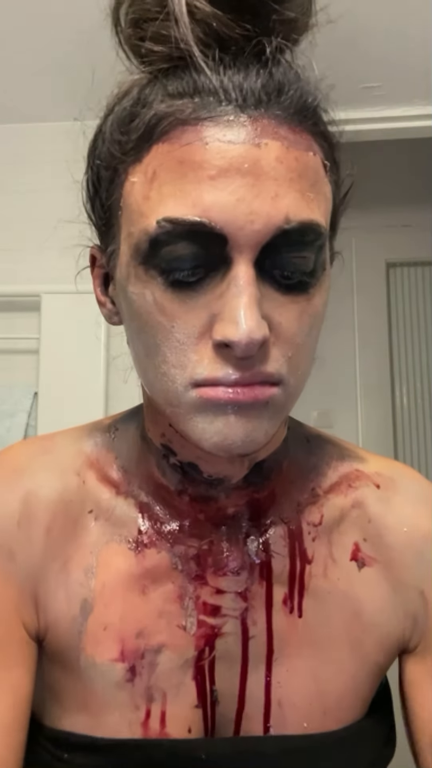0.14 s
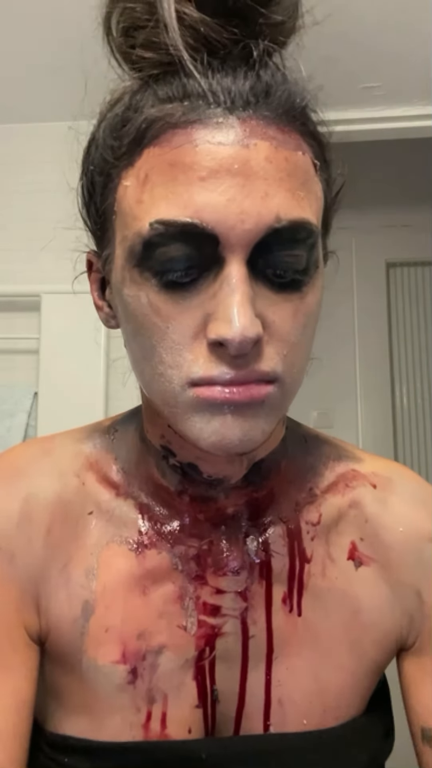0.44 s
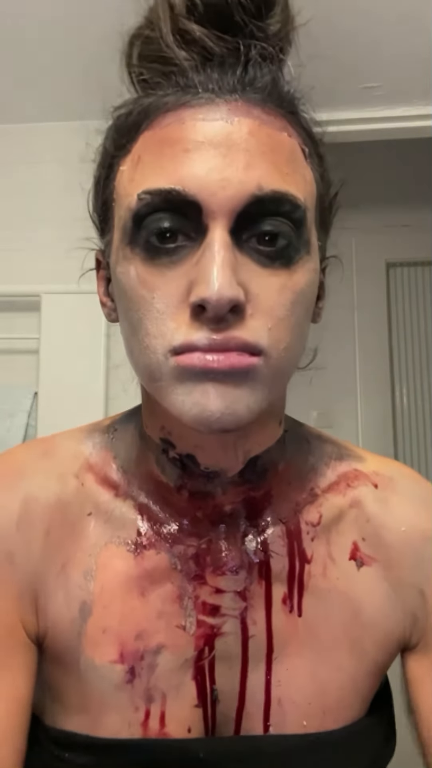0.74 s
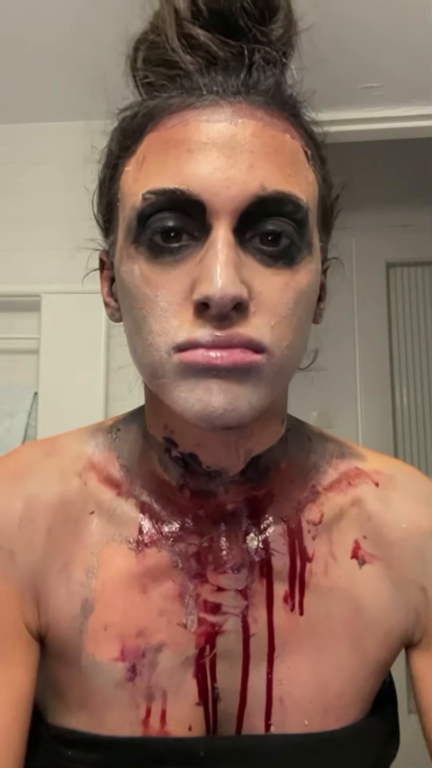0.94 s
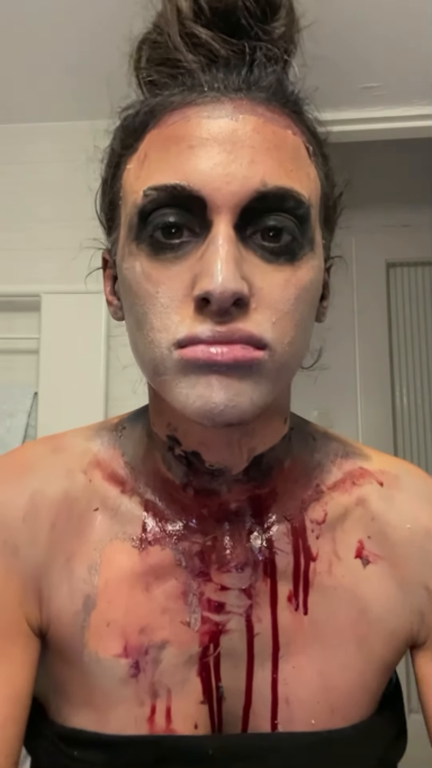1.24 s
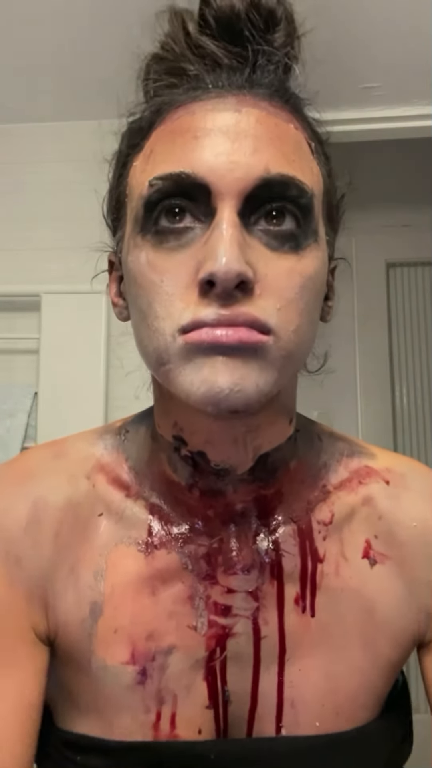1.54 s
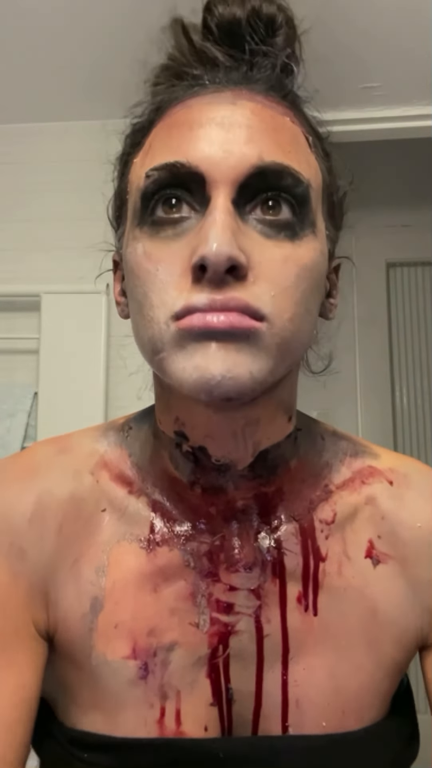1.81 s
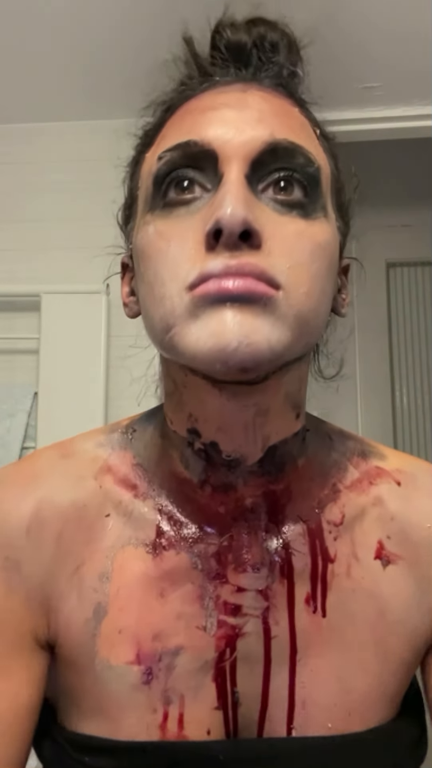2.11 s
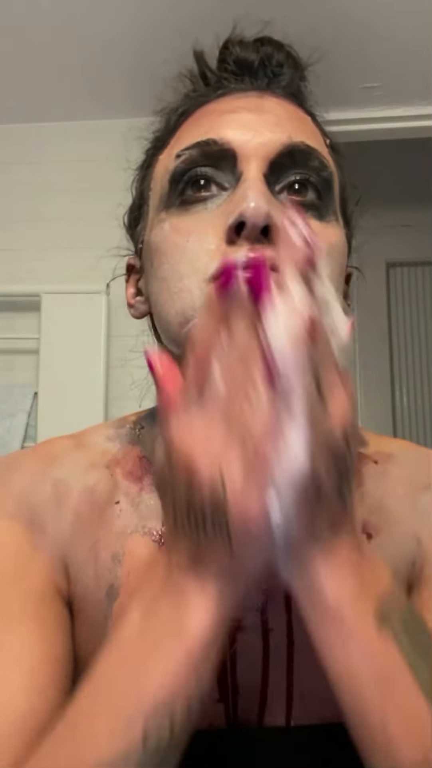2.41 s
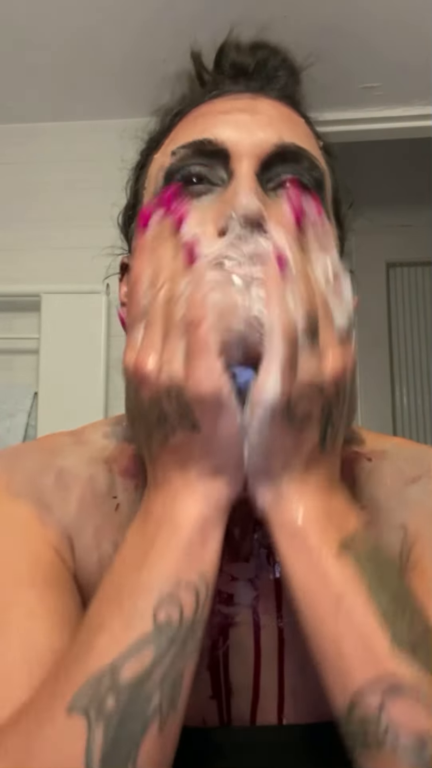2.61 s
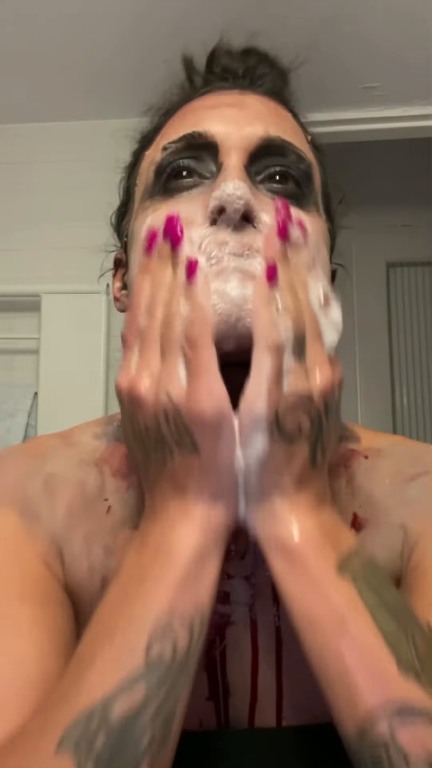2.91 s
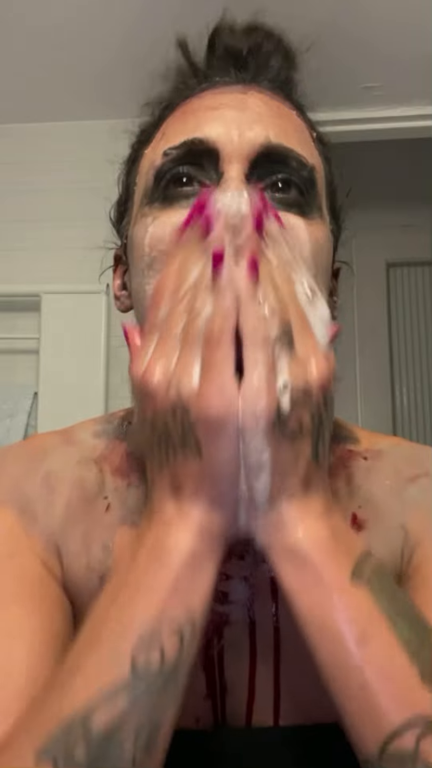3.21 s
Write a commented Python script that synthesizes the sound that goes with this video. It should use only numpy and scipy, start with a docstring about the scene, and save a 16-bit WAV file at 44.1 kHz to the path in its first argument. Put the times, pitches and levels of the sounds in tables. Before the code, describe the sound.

Soapy hands rub together from 0 to about 1.85 seconds: dense, bright, crackly squelches, strongest near 0.2 to 0.4, with snapping bubbles, rising plops, soft low thumps of air and a faint hollow basin ring. A near lull follows until about 2.35, then quieter sliding, tiny pops and dull cheek bumps near 2.7, and sparse wet clicks from 2.8 to the end. Small hard bathroom, close, steady hiss.

```python
"""Soapy hands over a basin

Wet hands rub together over a bathroom basin, then spread the lather more gently over a face.
Each squelch is a run of tiny ruptures: the soap film crackles, an air pocket rings, the flesh slaps.
Single bubbles snap, air pockets plop in rising notes, pushed air thumps low, wet skin slides.
Hands bump the cheeks, and the basin's hollow note sounds at listed moments.
The small hard room rings with resonances and decaying noise echoes, over a steady coloured hiss."""
import sys
import numpy as np
from scipy import signal
from scipy.fft import rfft, irfft
from scipy.io import wavfile

SR = 44100
rng = np.random.default_rng(int(sys.argv[2]) if len(sys.argv) > 2 else 0)


def transcribe(u):
    """Save the signal u as a 16-bit wav file named by the first command-line argument.

    u: samples, shape (n,) or (channels, n), limited to [-1, 1]; the rate is SR.
    q: integer samples, one column per channel.
    """
    v = np.clip(np.atleast_2d(u).T, -1, 1)
    q = np.round(v * 32767).astype(np.int16)
    wavfile.write(sys.argv[1], SR, q)


N = 147735
T = np.arange(N) / SR   # time in seconds

# Hand squeezes, except the first row, a short hissy burst; levels before the trims below:
# start_s, length_s, flesh_db, pocket_db, film_db, pocket_hz
SQUELCHES = [(0, 0.023, -55, -50.5, -36, 3130), (0.045, 0.039, -54.5, -44, -56, 2650),
             (0.121, 0.029, -40, -37, -34.5, 2340), (0.176, 0.016, -43.5, -38.5, -34.5, 2110),
             (0.202, 0.015, -38, -32, -33, 2850), (0.223, 0.0082, -33.5, -27, -20.5, 2700),
             (0.228, 0.022, -43, -52, -36.5, 2730.0), (0.284, 0.029, -40.5, -40.5, -55, 2030),
             (0.308, 0.012, -31, -31, -31.5, 2300), (0.333, 0.012, -47, -45, -36, 2000.0),
             (0.37, 0.022, -44, -32.5, -37, 2220), (0.384, 0.012, -31.5, -24, -29, 2790),
             (0.405, 0.024, -45, -61, -46, 2740.0), (0.492, 0.019, -41.5, -40, -41.5, 2520),
             (0.562, 0.025, -41.5, -36, -39.5, 1580), (0.667, 0.022, -45.5, -48, -48, 2300),
             (0.695, 0.0083, -67, -31.5, -36, 3100), (0.709, 0.022, -54, -46, -37, 3000),
             (0.748, 0.0082, -45, -37, -38, 2340), (0.764, 0.0072, -40, -28, -35.5, 1800),
             (0.78, 0.029, -48.5, -49, -50, 1760), (0.851, 0.012, -37.5, -35.5, -37.5, 2060),
             (0.872, 0.019, -37, -29.5, -31.5, 2360), (0.887, 0.0082, -39, -56, -36, 2140),
             (0.934, 0.012, -44, -33, -28.5, 2090), (0.953, 0.015, -32.5, -29.5, -33.5, 2130),
             (0.973, 0.018, -47.5, -40, -36, 3040), (1.063, 0.02, -35, -30.0, -31, 2350),
             (1.117, 0.018, -46, -39, -33.5, 2300), (1.14, 0.01, -29, -27.5, -30.5, 2090),
             (1.157, 0.018, -49, -33.5, -36, 2900), (1.249, 0.016, -37.5, -27, -31, 2005),
             (1.312, 0.0066, -35, -29, -29.5, 2270), (1.325, 0.015, -38.5, -31.5, -37, 1490),
             (1.356, 0.015, -48, -34, -32.5, 2980), (1.431, 0.011, -36.5, -28, -41, 2300),
             (1.496, 0.0091, -37.5, -31, -30.0, 2210), (1.509, 0.014, -38.5, -36.5, -37, 1460),
             (1.543, 0.0076, -52, -32.5, -35.5, 3460), (1.621, 0.017, -38.5, -32, -38, 2190),
             (1.686, 0.0097, -47, -30.5, -30, 3000), (1.705, 0.011, -32, -30.5, -27.5, 2200),
             (1.72, 0.013, -42, -43, -32, 1610), (1.788, 0.005, -38, -40, -42, 2200.0),
             (1.801, 0.0097, -33, -29.5, -30, 2580), (1.812, 0.02, -44.5, -34.5, -40.5, 1810),
             (2.279, 0.013, -52, -53, -46.5, 1390), (2.824, 0.016, -48.5, -42.5, -41.5, 3120),
             (2.868, 0.0093, -59, -37, -34.5, 3380), (2.911, 0.018, -76, -39, -55, 2390),
             (2.939, 0.0062, -66, -40, -53, 2760), (2.956, 0.014, -54, -41, -48, 3500),
             (3.037, 0.016, -48.5, -42, -40, 3180.0), (3.061, 0.0069, -65, -39, -37, 2510),
             (3.08, 0.0085, -56, -45, -40.5, 2400), (3.179, 0.025, -65, -46.0, -45, 2030),
             (3.253, 0.0049, -53.5, -44, -28.5, 2950), (3.27, 0.021, -59, -41.5, -50, 1600)]
# Tone of slapping flesh: frequency_hz, relative_level_db
FLESH_TONE = [(100, -17), (200, -8.5), (400, -5), (800, -3), (1100, 1), (1600, -15.5), (3000, -33.5)]
# Tone of the tearing soap film, also used by the snaps: frequency_hz, relative_level_db
FILM_TONE = [(1500, -21), (2800, -6.5), (3800, -3.5), (5400, 3.5), (7200, 0), (8600, -9.5), (10000, -17),
             (12000, -19.5), (14000, -8.5), (16000, -20)]
# Tone around the air pocket's resonance: frequency_hz, relative_level_db
POCKET_TONE = [(400, -7), (900, -9), (1300, 0), (2000, -1.5), (3200, 0.5), (4200, 0), (7000, 3),
               (12000, -74)]
FLESH_TRIM_DB, FILM_TRIM_DB = -2.5, -0.5
RUPTURES_PER_S, RUPTURE_SPREAD_DB = 1050, 4.3
PRESS_ATTACK_S, PRESS_RELEASE_S = 0.00074, 0.0017   # time constants
POCKET_WIDTH_HZ, FILM_BUBBLE_HZ = 1050, 5320
POCKET_BUBBLE_GAIN = 0.89   # bubbles against ruptures in the pocket


def squelches(size=4096):
    """Each row sends a run of ruptures into flesh, air pocket and film, and sets bubbles ringing."""
    out, t = np.zeros(N), T[:size]
    for start_s, length_s, flesh_db, pocket_db, film_db, pocket_hz in SQUELCHES:
        attack = 1 - np.exp(-t / PRESS_ATTACK_S)
        release = np.exp(-np.maximum(t - length_s, 0) / PRESS_RELEASE_S)
        press = attack * release

        slap, gurgle, crackle = (press * ruptures(RUPTURES_PER_S, RUPTURE_SPREAD_DB, size) for _ in range(3))
        gurgle = rms_one(resonate(gurgle, pocket_hz, POCKET_WIDTH_HZ))
        gurgle = gurgle + POCKET_BUBBLE_GAIN * bubbles(press, pocket_hz)
        film_bubbles = colour(bubbles(press, FILM_BUBBLE_HZ), FILM_TONE)
        crackle = rms_one(colour(crackle, FILM_TONE)) + rms_one(film_bubbles)

        flesh = from_db(flesh_db + FLESH_TRIM_DB) * rms_one(colour(slap, FLESH_TONE))
        pocket = from_db(pocket_db) * rms_one(colour(gurgle, POCKET_TONE))
        film = from_db(film_db + FILM_TRIM_DB) * rms_one(crackle)
        press_rms = np.sqrt(np.mean(press ** 2))   # a shorter press carries less energy
        add(out, start_s, (flesh + pocket + film) * press_rms)
    return out


SMEAR_GAIN = 0.06   # noise against the clicks


def ruptures(per_s, spread_db, size):
    """Random clicks of either sign and uneven size over a faint smear of noise; rms 1."""
    size_db = spread_db * np.minimum(rng.exponential(1, size), 4)
    sizes = from_db(size_db) * rng.choice([-1, 1], size)
    clicks = rms_one(sizes * (rng.random(size) < per_s / SR))
    return rms_one(clicks + SMEAR_GAIN * rng.standard_normal(size))


BUBBLE_Q, BUBBLE_SPREAD_OCT = 13, 0.858   # pitch strays this far up or down
BUBBLE_MAX_RISE_PER_S = 30.8   # fraction of the starting pitch gained each second


def bubbles(press, hz, count=22):
    """Tiny bubbles around one pitch, each with its own size and glide, born during the press; rms 1."""
    out = np.zeros(2 * len(press))
    for when, octaves, rise, strength in rng.random((count, 4)):
        # births are likelier where the press is stronger
        i = np.searchsorted(np.cumsum(press), when * press.sum())
        bubble_hz = np.clip(hz * 2 ** (BUBBLE_SPREAD_OCT * (2 * octaves - 1)), 300, 9000)
        decay_s = BUBBLE_Q / (np.pi * bubble_hz)
        ring = bubble(bubble_hz, decay_s, rise * BUBBLE_MAX_RISE_PER_S)
        out[i:i + len(ring)] += (2 * strength - 1) * np.sqrt(bubble_hz) * ring
    return rms_one(out[:len(press)])


def bubble(hz, decay_s, rise_per_s, size=1024):
    """Trapped air rings and dies away while its pitch rises."""
    t = T[:size]
    return rising_tone(hz, rise_per_s, t) * np.exp(-t / decay_s)


def rising_tone(hz, rise_per_s, t):
    """A sine whose pitch climbs steadily by a fraction of its start each second."""
    return np.sin(2 * np.pi * hz * t * (1 + rise_per_s * t / 2))


# Single bubbles snapping, level of the ring's peak: start_s, ring_peak_db, start_pitch_hz
SNAPS = [(0.2066, -12, 5200), (0.2274, -12.5, 3770), (0.4168, -15, 5440), (0.7013, -19.5, 5140),
         (0.979, -16.5, 3350), (1.162, -18, 2910), (1.3629, -19.5, 4500), (2.374, -29.5, 4900),
         (2.3945, -37, 3840), (2.4152, -34, 3500), (2.58, -33, 3650), (2.651, -34.5, 3670),
         (2.6843, -26.5, 3360), (2.7326, -28, 3850), (2.8319, -20.5, 4700), (2.9141, -26, 2660),
         (2.956, -25.5, 3450), (2.9633, -30, 3400), (2.969, -27, 6500), (3.0452, -22.5, 3880),
         (3.2554, -18.5, 4930)]
SNAP_CYCLES, SNAP_RISE_PER_S = 16, 15.4   # cycles to fall 60 dB; pitch rise as a fraction per second
CRACK_DB, SPRAY_DB, SPRAY_DECAY_S = -11, -11, 0.0023   # levels against the ring, before the pitch factor


def snaps(size=1024):
    """A bubble cracks, rings for a few cycles at a rising pitch and throws a little spray."""
    out, t = np.zeros(N), T[:size]
    crack = colour(1. * (t == 0), FILM_TONE)   # one click through the film
    crack = from_db(CRACK_DB) * crack / crack.max()
    for start_s, peak_db, hz in SNAPS:
        swell = 1 - np.exp(-2 * t * hz)
        decay = from_db(-60 * t * hz / SNAP_CYCLES)
        ring = rising_tone(hz, SNAP_RISE_PER_S, t) * decay * swell
        spray = rms_one(colour(rng.standard_normal(size), FILM_TONE)) * np.exp(-t / SPRAY_DECAY_S)
        burst = crack + from_db(SPRAY_DB) * spray
        burst = min(hz / 3500, 1) * burst   # big, low bubbles crack and spray less
        add(out, start_s, from_db(peak_db) * (ring / ring.max() + burst))
    return out


# Trapped air plopping out, peak before the room: start_s, peak_db, start_pitch_hz
PLOPS = [(.14, -23.5, 2067), (.2218, -12.5, 2411), (0.2261, -14.5, 3080), (0.3163, -23, 2270),
         (.3885, -19.5, 3390), (.3893, -20, 2030), (0.393, -19.5, 3020), (0.5696, -28.5, 950),
         (.579, -28, 1560), (0.6066, -24.5, 2660), (0.7662, -22, 1920), (.863, -26, 3120),
         (0.8822, -24.5, 2900), (.954, -15, 1820), (.962, -20, 2400), (1.138, -20, 1851), (1.147, -26, 606),
         (1.257, -26, 2230), (1.3613, -25, 4010), (1.4312, -24.5, 1305), (1.434, -22.5, 3330),
         (1.546, -28, 3210), (1.627, -22, 2460), (1.7071, -19.5, 5520), (1.8, -24.5, 2928),
         (2.286, -37, 1270), (2.9123, -30, 1500), (2.924, -31, 1440), (3.0623, -26, 4120),
         (3.063, -22.5, 2325), (3.277, -33, 1180), (3.3, -35.5, 1310)]
PLOP_SWELL_S, PLOP_DECAY_S, PLOP_RISE_PER_S = 0.001, 0.0016, 6.3   # rise as a fraction per second


def plops():
    """Air pockets pinch off between the palms: round, rising notes with no crack."""
    out = np.zeros(N)
    for start_s, peak_db, hz in PLOPS:
        ring = bubble(hz, PLOP_DECAY_S, PLOP_RISE_PER_S)
        ring = ring * (1 - np.exp(-T[:len(ring)] / PLOP_SWELL_S))
        add(out, start_s, from_db(peak_db) * ring / ring.max())
    return out


# Low thumps of pushed air, level before the swell and decay: start_s, level_db
PUFFS = [(0.389, -34.5), (0.77, -38), (0.959, -29.5), (1.147, -31), (1.335, -39), (1.522, -44),
         (1.709, -34.5)]
SWEEP_START_HZ, SWEEP_END_HZ, SWEEP_FALL_S = 471, 48.7, 0.00655
PUFF_ATTACK_S, PUFF_DECAY_S = 0.0057, 0.011


def puffs(size=6000):
    """Soft low thumps of pushed air, their lowest part delayed so that each is heard as a falling sweep."""
    out, t = np.zeros(N), T[:size]
    hz = SWEEP_END_HZ + (SWEEP_START_HZ - SWEEP_END_HZ) * np.exp(-t / SWEEP_FALL_S)
    swell = 1 - np.exp(-t / PUFF_ATTACK_S)
    puff = np.sin(2 * np.pi * np.cumsum(hz) / SR) * swell * np.exp(-t / PUFF_DECAY_S)
    for start_s, level_db in PUFFS:
        add(out, start_s, from_db(level_db) * puff)
    return out


# Loudness of wet skin sliding between squelches, before the room: time_s, level_db
SLIDE_LEVEL = [(0, -49.5), (.3, -42.5), (.65, -48.5), (1.1, -43.5), (1.6, -45), (1.83, -44), (1.92, -54.5),
               (2.22, -54), (2.35, -49.5), (2.52, -55), (2.78, -49.5), (2.95, -51.5), (3.14, -54),
               (3.35, -51.5)]
# Tone of the sliding lather: frequency_hz, relative_level_db
SLIDE_TONE = [(200, -9), (500, 1), (1200, 0.5), (3000, 3), (7000, 4), (10000, -22), (16000, -3)]
SLIDE_GRAINS_PER_S = 990


def slide():
    """Moving hands draw a fine crackle of equal-sized grains from the lather."""
    grains = colour(ruptures(SLIDE_GRAINS_PER_S, 0, N), SLIDE_TONE)
    return from_db(np.interp(T, *np.transpose(SLIDE_LEVEL))) * rms_one(grains)


# Hands softly bumping the cheeks, peak of the envelope: start_s, peak_db, pitch_hz
BUMPS = [(2.621, -57, 136), (2.699, -43.5, 166), (2.71, -45.5, 217)]
BUMP_RISE_S = 0.0067


def bumps(size=4096):
    """Skin on skin gives dull, short thuds: low sines that swell and fade."""
    out, t = np.zeros(N), T[:size]
    envelope = t / BUMP_RISE_S * np.exp(1 - t / BUMP_RISE_S)
    for start_s, peak_db, hz in BUMPS:
        add(out, start_s, from_db(peak_db) * np.sin(2 * np.pi * hz * t) * envelope)
    return out


# Moments when the basin's hollow note sounds, some with only faint squelches;
# level before the swell and decay: start_s, level_db
BASIN_NOTES = [(.05, -43.5), (.387, -30.5), (.563, -36.5), (.958, -38), (1.143, -29.5), (1.437, -36),
               (1.504, -34.5)]
BASIN_HZ, BASIN_T60_S, BASIN_SWELL_S = 416, 0.24, 0.0023


def basin_note():
    """The hollow note of the basin swells and rings on at one pitch at each listed moment."""
    out = np.zeros(N)
    swell = 1 - np.exp(-T / BASIN_SWELL_S)
    note = np.sin(2 * np.pi * BASIN_HZ * T) * swell * from_db(-60 * T / BASIN_T60_S)
    for start_s, level_db in BASIN_NOTES:
        add(out, start_s, from_db(level_db) * note)
    return out


# Ringing modes of the basin and room corners: frequency_hz, level_db, t60_s
ROOM_MODES = [(208.5, 6.5, 0.45), (241, 6, 0.32), (415.7, 9, 0.1), (800, 3, 0.095), (1019, 4.5, 0.22),
              (2970, -6, 0.13)]
LESS_ECHO_S, LESS_ECHO_DB = 1.5, -1.5   # from here on the hands echo less
HAND_MOVE_S = 0.25   # a fresh echo pattern this often


def bathroom(x):
    """The echoes change as the hands move; the resonant modes keep their pitches."""
    wet = x * from_db(LESS_ECHO_DB * (T > LESS_ECHO_S))
    out = x.copy()
    for hz, level_db, t60_s in ROOM_MODES:
        width_hz = np.log(1000) / (np.pi * t60_s)
        out += from_db(level_db) * resonate(wet, hz, width_hz)
    step = int(HAND_MOVE_S * SR)
    for i in range(0, N, step):
        add(out, i / SR, signal.fftconvolve(wet[i:i + step], echoes()))
    return out


# How long the room's tail rings: frequency_hz, t60_s
ROOM_T60 = [(100, 0.33), (500, 0.33), (1500, 0.23), (4000, 0.22), (8000, 0.21), (16000, 0.18)]
TAIL_DB, TAIL_DELAY_S = -7.5, 0.0081
EARLY_DB, EARLY_DECAY_S, EARLY_PER_S = -4.5, 0.013, 1500


def echoes(size=20000):
    """Quick reflections off basin and mirror, then a diffuse noise tail dying at its own rate per band."""
    t, white = T[:size], rfft(rng.standard_normal(size))
    hz, edges = np.fft.rfftfreq(size, 1 / SR), np.geomspace(50, SR / 2, 10)
    tail = np.zeros(size)
    for low, high in zip(edges, edges[1:]):
        band = irfft(white * (hz >= low) * (hz < high))
        tail += band * from_db(-60 * t / at_hz(ROOM_T60, np.sqrt(low * high)))
    tail = tail * (t > TAIL_DELAY_S)

    early = rng.standard_normal(size) * (rng.random(size) < EARLY_PER_S / SR)
    early = early * np.exp(-t / EARLY_DECAY_S) * (t > .001)
    # each part is set to unit energy before its level
    tail = from_db(TAIL_DB) * tail / np.linalg.norm(tail)
    return tail + from_db(EARLY_DB) * early / np.linalg.norm(early)


# Tone of the steady hiss: frequency_hz, relative_level_db
HISS_TONE = [(15, -45), (25, -4), (59, -2.5), (277, -4), (335, 5), (677, -13), (754, -21), (863, -10),
             (1400, -11), (1650, -20), (1940, -5), (2760, -18), (3430, -5), (4370, -25), (6740, -1.5),
             (8830, -5.5), (10100, -17), (14000, -7), (16000, -9.5)]
HISS_DB = -47   # rms, before the top is cut


def hiss():
    """Steady background noise with a fixed spectrum."""
    return from_db(HISS_DB) * rms_one(colour(rng.standard_normal(N), HISS_TONE, size=8192))


def from_db(db):
    """Decibels to gain."""
    return 10 ** (np.asarray(db) / 20)


def rms_one(x):
    """Scale to unit rms."""
    return x / np.sqrt(np.mean(x ** 2) + 1e-20)


def at_hz(points, hz):
    """Read a table on a log-frequency axis."""
    f, v = np.transpose(points)
    return np.interp(np.log(np.maximum(hz, 1)), np.log(f), v)


def colour(x, spectrum, size=2048):
    """Causal (minimum-phase) filter with the given spectrum."""
    gain = from_db(at_hz(spectrum, np.fft.rfftfreq(size, 1 / SR)))
    cepstrum = irfft(np.log(gain))
    # folding the cepstrum forward gives minimum phase
    cepstrum[1:size // 2] *= 2
    cepstrum[size // 2 + 1:] = 0
    impulse = irfft(np.exp(rfft(cepstrum)))
    return signal.fftconvolve(x, impulse)[:len(x)]


def resonate(x, hz, width_hz):
    """A two-pole resonance with gain of about 1 on top."""
    r = np.exp(-np.pi * width_hz / SR)
    zeros = np.array([1, 0, -1]) * (1 - r * r) / 2
    poles = [1, -2 * r * np.cos(2 * np.pi * hz / SR), r * r]
    return signal.lfilter(zeros, poles, x)


def add(out, s, x):
    """Mix a sound in at time s."""
    i = max(int(s * SR), 0)
    out[i:i + len(x)] += x[:max(N - i, 0)]


def scene():
    """The hands in the room, with bumps, basin note and hiss added without echoes."""
    hands = squelches() + snaps() + plops() + puffs() + slide()
    return (bathroom(hands) + bumps() + basin_note() + hiss())[None]


CUTOFF_HZ = 16100


def record(dry):
    """A steep elliptic low-pass cuts the top."""
    low_pass = signal.ellip(12, .2, 80, CUTOFF_HZ, fs=SR, output="sos")   # ripple, stopband in dB
    return signal.sosfilt(low_pass, dry)


dry = scene()
out = record(dry)
transcribe(out)
```